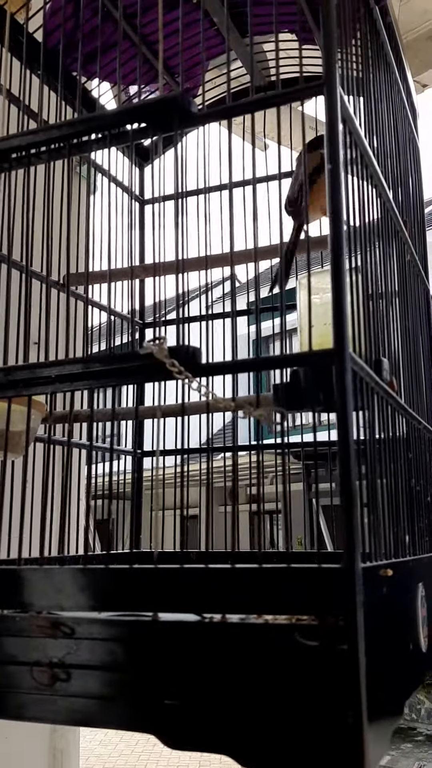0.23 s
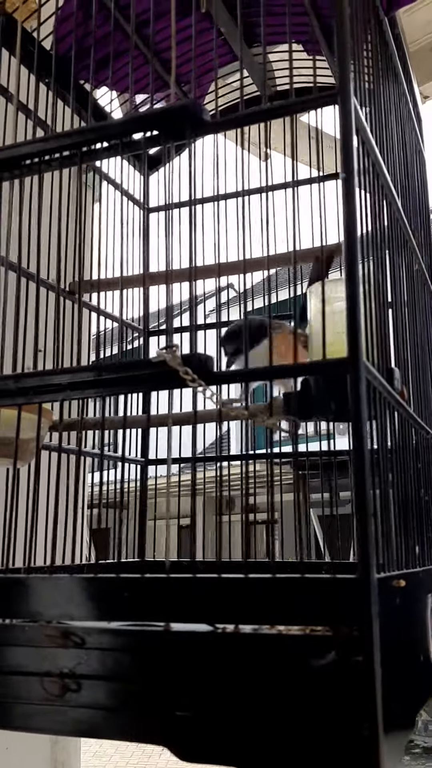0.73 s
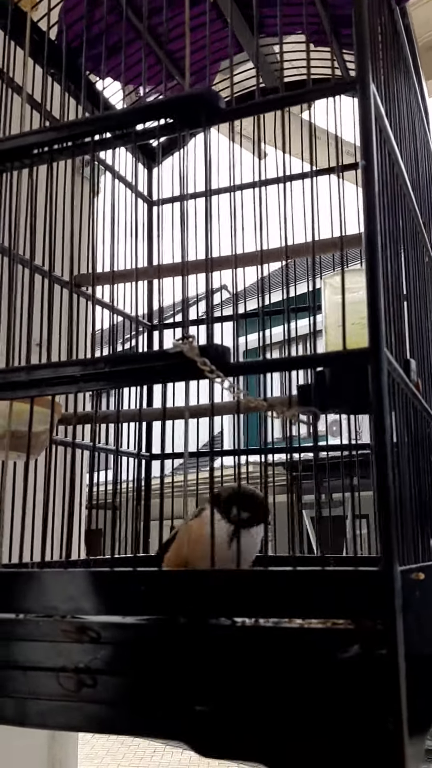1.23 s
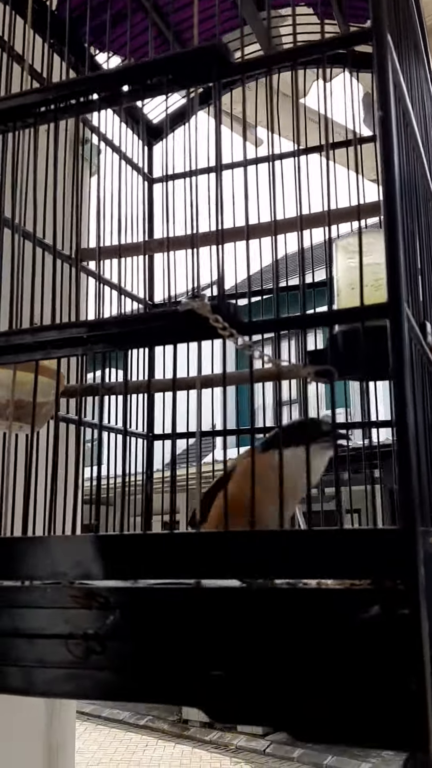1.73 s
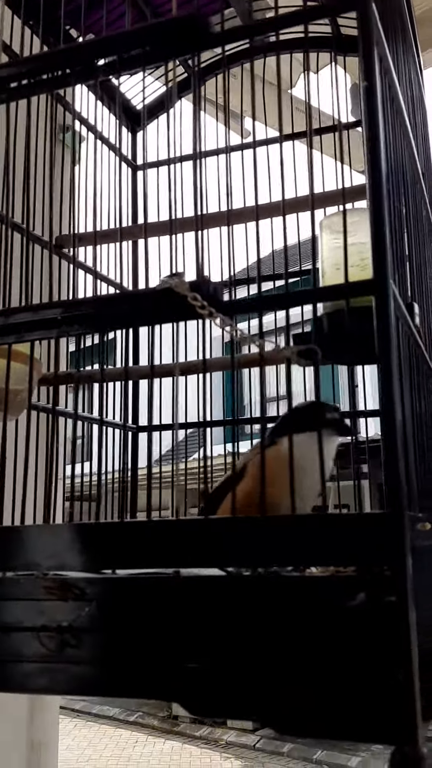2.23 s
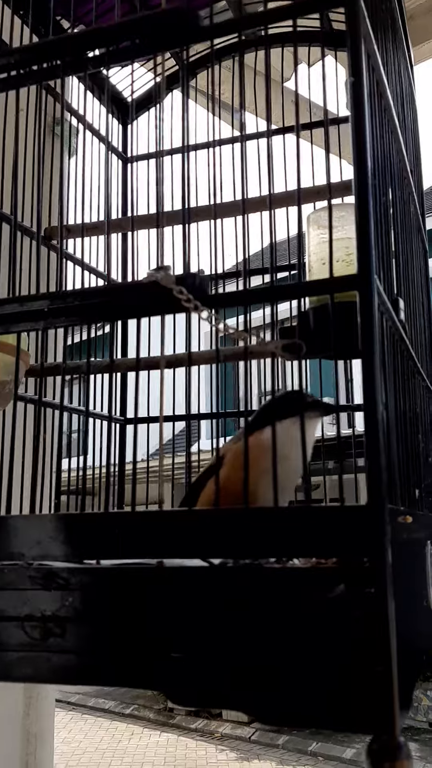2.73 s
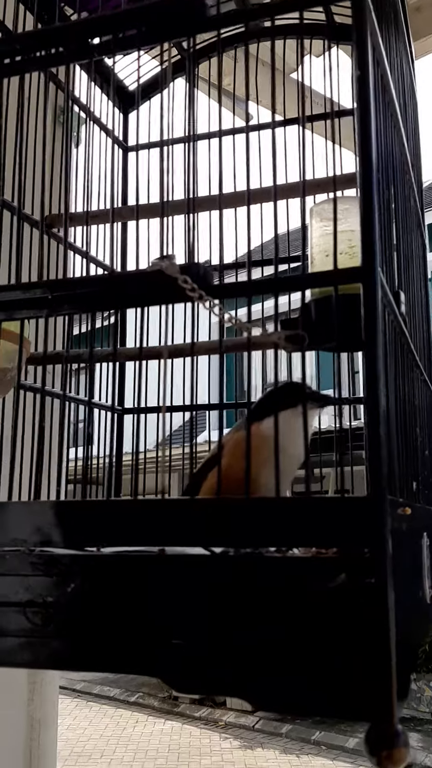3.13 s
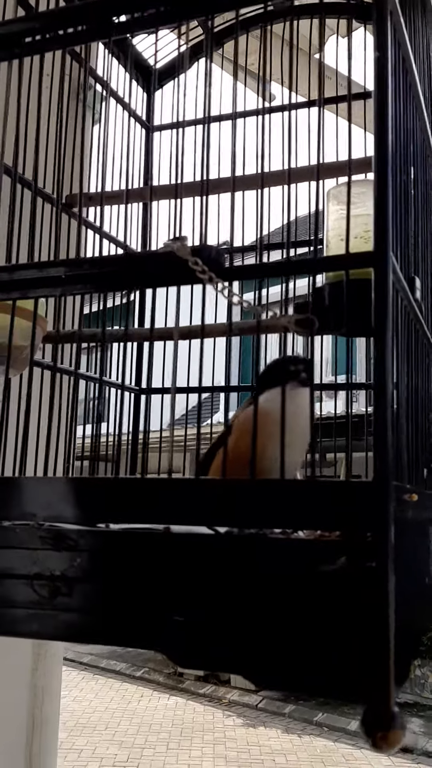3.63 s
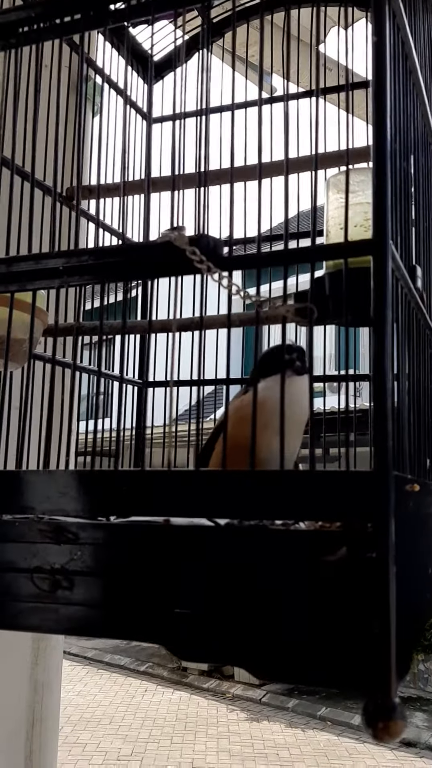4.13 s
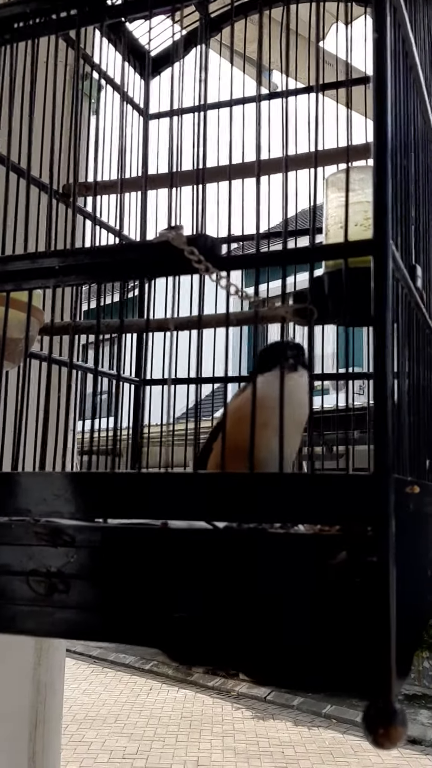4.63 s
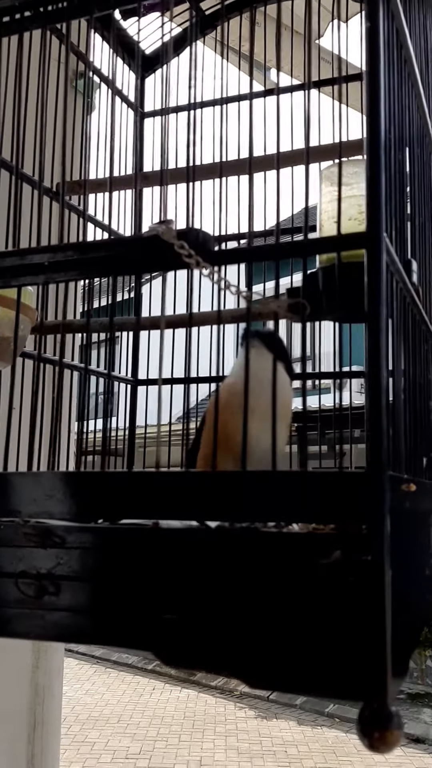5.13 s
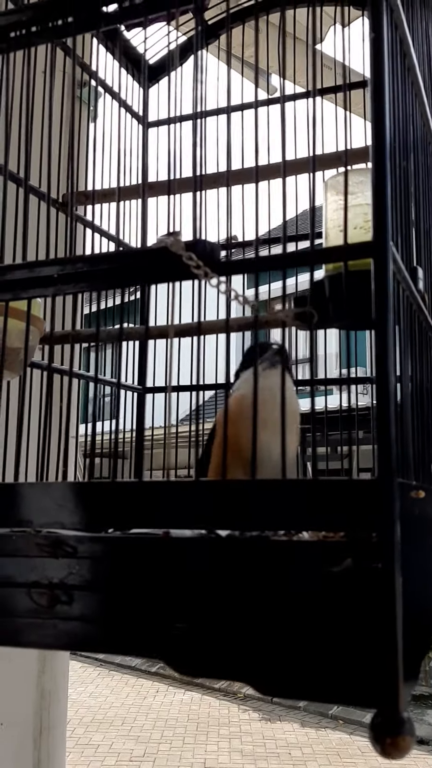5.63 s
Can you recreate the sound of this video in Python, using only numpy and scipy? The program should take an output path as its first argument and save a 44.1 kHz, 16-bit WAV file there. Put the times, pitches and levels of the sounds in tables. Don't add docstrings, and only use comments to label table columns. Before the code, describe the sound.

A caged shrike about a metre away starts with sparse, quieter rasps while claws tick lightly on the cage floor. Then it settles into a steady row of loud, harsh, clipped notes, about three a second, echoing off porch walls and paving. Another bird chirps faintly across the yard. Wind thumps the stereo phone microphone over a soft town drone.

```python
import sys
import numpy as np
from scipy import signal
from scipy.fft import rfft, irfft, next_fast_len
from scipy.io import wavfile
from scipy.ndimage import uniform_filter1d

SR = 44100
rng = np.random.default_rng(int(sys.argv[2]) if len(sys.argv) > 2 else 0)


def pcm_store(signal):
    levels = np.round(np.clip(np.atleast_2d(signal), -1, 1) * 32767)
    wavfile.write(sys.argv[1], SR, levels.astype(np.int16).T)


def boost_factor(decibels):
    exponent = np.asarray(decibels, float) / 20
    return 10 ** exponent


N = 259294
LEAD_IN = SR // 5
M = N + LEAD_IN

# start_s, length_ms, start_pitch_hz, crest_pitch_hz, level_db
RASP_RISES = [
    (.188, 29, 1200, 2200, -26.5),
    (.935, 32, 950, 1800, -22),
    (1.527, 33, 1000, 2750, -19.5),
]
RASP_FALLS = [
    (.209, 34, 2000, 2080, -28),
    (.961, 31, 1850, 2050, -20.5),
    (1.56, 25, 2300, 2030, -22),
]
DROPS = [(1.803, 23, 2550, 2330, -13.5), (2.078, 23, 2580, 2300, -13.5), (2.395, 20.5, 2255, 2430, -12.5),
         (2.7197, 22, 2300, 2470, -12.5), (3.020, 22.5, 2200, 2330, -12), (3.336, 24, 2360, 2400, -14)]
WIDE_DROPS = [(-.06, 37.5, 1500, 2600, -23), (1.286, 21.5, 2380, 2220, -17), (3.627, 25, 1800, 2090, -14.5)]
ARCHES = [(3.913, 27, 1400, 1530, -13), (4.2375, 25, 1290, 1520, -16), (4.591, 25, 1300, 1570, -15.5),
          (4.857, 32, 1150, 1640, -15.5), (5.1165, 29, 1250, 1640, -17), (5.405, 32, 1240, 1560, -14),
          (5.672, 33, 1240, 1440, -15.5)]
RISE_PATH = (.15, .56, .01, .01)
FALL_PATH = (.99, .99, .13, .36)
DROP_PATH = (.99, .99, .3, .58)
WIDE_PATH = (.99, .99, .25, .46)
ARCH_PATH = (.6, .99, .01, .18)
# attack_ms, fade_db, roughness_0_to_1, low_end_db
RISE_VOICE = (20, -13, .31, 1.5)
FALL_VOICE = (1.8, 6, .19, 9)
DROP_VOICE = (3.1, 14, .21, .1)
WIDE_VOICE = (1.8, .5, .28, 4)
ARCH_VOICE = (1.8, -2.5, .15, -.5)
# time_s, beak_stretch_ratio, treble_db, left_minus_right_db
HEAD_TURNS = [(-.06, 1.2, .1, -1.5), (.19, .78, -2.5, -4.5), (.935, 1.2, 6.5, -12), (.961, .96, 7, -5),
              (1.29, .96, -13, -13), (1.55, .9, 3, -6.5), (1.8, 1.06, 2.5, -12.5), (2.4, 1.02, -1, -11),
              (3.34, 1.03, .5, -7), (3.63, 1.28, -.2, -7), (3.91, .99, .1, -5), (4.86, 1.03, -.5, -4.2),
              (5.12, .92, -4.5, -4.5), (5.41, 1.01, -1.2, -4), (5.67, 1.02, -3.5, -4)]
# freq_hz, level_db
SHRIKE_THROAT = [(500, -60), (950, -21), (1430, -17.5), (2300, -13), (3000, -5.5), (3700, -4), (4500, 2.7),
                 (5200, -6), (6100, -8.5), (7570, -15.5), (9900, -16), (12500, -18.5), (16500, -23.5)]
# start_s, length_ms, start_pitch_hz, end_pitch_hz, level_db
FAR_SYLLABLES = [(.513, 79.7, 2510, 1880, -46), (.598, 38.2, 2740, 3220, -42), (.635, 90, 2950, 2640, -52),
                 (.64, 128, 3826, 3640, -49), (3.837, 42.4, 2620, 2530, -50.5),
                 (3.865, 52.5, 3040, 3380, -47.5), (3.941, 121.1, 4501, 3950, -41),
                 (3.945, 89, 3400, 3240, -48), (5.048, 36, 2950, 2900, -43.5), (5.09, 30, 2290, 1820, -50),
                 (5.15, 158.4, 3380, 3600, -44.5), (5.2, 90, 4350, 4280, -50)]
# freq_hz, level_db
FAR_THROAT = [(1500, -27), (2300, -16.5), (3000, -5), (3800, 1.3), (5000, -5), (6200, -5), (7600, -15.5),
              (9200, -17), (10500, -17), (12000, -12), (14000, -21), (16500, -35)]
# delay_left_ms, delay_right_ms, level_left_db, level_right_db
ECHOES = [(3.204, 2.6, -11.5, -31.5), (7.505, 7.5, -30.5, -14), (12.2, 4.9, -29, -13.5),
          (16.88, 27, -17.5, -17), (25.9, 23, -43, -27.5), (31.7, 31, -26, -19.5)]
# freq_hz, t60_s
YARD_T60 = [(1000, 1), (2500, 0.47), (5000, 0.58), (8000, 0.44), (14000, 0.36)]
# freq_hz, left_minus_right_db
PORT_BALANCE = [(60, 4.0), (110, 0.0), (200, -1.5), (380, -1.5), (700, -5), (1290, 12), (2380, 1),
                (4400, 10.5), (8120, 1.5), (15000, 6)]
# freq_hz, left_lead_rad
PORT_LEAD = [(1, 1), (1380, 1.44), (1980, 1), (3190, 2.5), (3620, 2.4), (4130, 1.23), (5340, 0.95),
             (6370, 2), (7670, 2), (11900, 5), (15200, 4.5), (16500, 41)]
# time_s, tick_db, knock_pitch_hz, knock_db, left_minus_right_db
CLAWS = [(0.7794, -57, 600, -63, -3.0),
         (0.8594, -43, 695, -46, -2.5),
         (1.0694, -32, 1130, -44, -1.5),
         (1.0899, -35, 814, -35, -3.0),
         (1.1114, -33, 854, -42, -2),
         (1.1174, -33, 785, -35, -4),
         (1.2191, -35.5, 616, -44, -3.5),
         (1.792, -62, 1020, -34.5, .1)]
# peak_s, peak_db, die_by_10db_s, left_minus_right_db
GUSTS = [(0, -40, .03, -20), (.16, -47, .1, -15), (.47, -42, .07, 8), (.6, -30, .13, -10),
         (.8, -28.5, .08, -6), (.98, -37, .08, -2), (1.17, -37.5, .09, -9), (1.5, -40.5, .25, -3),
         (2.08, -48, .1, 2), (2.86, -43.5, .14, -5), (3.22, -46, .07, -12), (3.5, -48, .06, 8),
         (3.68, -42, .12, 9), (4.01, -45.5, .07, 9), (4.8, -52, .06, 15), (5.06, -49, .1, 10),
         (5.42, -48, .07, 5), (5.67, -45, .06, 8), (5.82, -52, .08, 10)]
# freq_hz, level_db
WIND_COLOUR = [(12, -43), (20, -68), (46, 3), (93, 2), (198, -11), (398, -27), (455, -27), (490, -29.5),
               (700, -31.5), (910, -63), (1540, -120)]
# start_s, length_s, pitch_hz, level_db, unsteadiness_hz
TONES = [
    (.2, 0.64, 462.1, -57.5, 7.6),
    (1.08, 0.39, 468.5, -53.5, 9.2),
    (2.476, 0.11, 307, -43.5, 32),
    (2.688, 0.3, 7100, -60, 6.2),
    (4.354, 0.24, 6975, -65, 6),
]
# freq_hz, level_db
TOWN_COLOUR = [(41, -7), (70, -2.5), (146, 2.5), (480, -14), (1550, -20.5), (1820, -22), (3300, -26),
               (4440, -20.5), (7030, -28.5), (8440, -41), (9250, -37), (13700, -39), (16800, -58)]
# freq_hz, level_under_neighbours_db
MASKED = [(2000, -25), (5000, -16), (8500, -4.5), (14000, -1.5)]


def curve(points, hz):
    at, value = np.transpose(points)
    return np.interp(np.log(np.maximum(hz, 1)), np.log(np.maximum(at, 1)), value)


def shape(x, response):
    size = next_fast_len(x.shape[-1])
    hz = np.arange(size // 2 + 1) * SR / size
    return irfft(rfft(x, size) * response(hz), size)[..., :x.shape[-1]]


def unit(x):
    return x / np.sqrt(np.mean(x ** 2, axis=-1, keepdims=True))


def wobble(size, rate):
    k = max(int(SR / rate), 1)
    return unit(uniform_filter1d(uniform_filter1d(rng.standard_normal(size), k), k))


def add(track, s, sound):
    i = int(s * SR) + LEAD_IN
    track[..., i:i + sound.shape[-1]] += sound


def pan(left_minus_right_db):
    return boost_factor(np.array([[left_minus_right_db], [-left_minus_right_db]]) / 2)


def syllable(ms, pitch_hz, db, attack_ms, fade_db, rough, colour):
    t = np.arange(8192) / SR
    u = np.minimum(t * 1e3 / ms, 1)
    glide = np.interp(u, [0, 1 / 3, 2 / 3, 1], pitch_hz)
    hz = uniform_filter1d(glide, int(ms * SR / 4000), mode="nearest")
    phase = 2 * np.pi * np.cumsum(hz * (1 + 0.095 * rough * wobble(len(t), 1002))) / SR

    k = np.arange(1, 15)[:, None]
    audible = k * hz < .45 * SR
    tiring = boost_factor(-1.7 * k * u)
    stack = np.sum(np.cos(k * phase + .3 * k ** 2) * audible * tiring, axis=0)
    onset = np.exp(-t * 1e3 / attack_ms)
    breath = rough * (1.7 + 6 * onset) * rng.standard_normal(len(t))
    source = (1 + .7 * rough * wobble(len(t), 500)) * stack + breath

    swell = (1 - onset) ** 2 * boost_factor(-fade_db * u) * np.maximum(1 - u ** 4.7, 0) ** 0.87
    sound = np.roll(shape(np.roll(swell * source, 64), colour), -64)
    return boost_factor(db) * sound / np.sqrt(np.sum(sound ** 2) / (ms / 1e3 * SR))


def shrike():
    near, mouth = np.zeros((2, M)), np.zeros(M)
    head_s, *head = np.transpose(HEAD_TURNS)
    kinds = [(RASP_RISES, RISE_PATH, RISE_VOICE), (RASP_FALLS, FALL_PATH, FALL_VOICE),
             (DROPS, DROP_PATH, DROP_VOICE), (WIDE_DROPS, WIDE_PATH, WIDE_VOICE),
             (ARCHES, ARCH_PATH, ARCH_VOICE)]
    for notes, (early, late, sag, sag_end), (attack_ms, fade_db, rough, low_db) in kinds:
        for s, ms, start_hz, crest_hz, db in notes:
            climb_hz = (crest_hz - start_hz) * np.array([0, early, late, 1])
            pitch_hz = start_hz + climb_hz - crest_hz * np.array([0, 0, sag, sag_end])
            beak, bright_db, pan_db = (np.interp(s, head_s, column) for column in head)
            tilt = [(2600, low_db), (3600, 0.015), (6500, 0.012), (10000, bright_db)]
            colour = lambda f: boost_factor(curve(SHRIKE_THROAT, f / beak) + curve(tilt, f))
            sound = syllable(ms, pitch_hz, db, attack_ms, fade_db, rough, colour)
            add(near, s, sound * pan(pan_db))
            add(mouth, s, sound)
    return near, mouth


def far_bird():
    far = np.zeros(M)
    bow, attack_ms, fade_db_per_s = .03, 5, 30
    base_rough, strain_hz, strain_per_khz = .26, 3450, .65
    for s, ms, start_hz, end_hz, db in FAR_SYLLABLES:
        pitch_hz = np.linspace(start_hz, end_hz, 4) * (1 + bow * np.array([0, 1, 1, 0]))
        strain = strain_per_khz * max(start_hz - strain_hz, 0) / 1e3
        rough = min(base_rough + strain, 1)
        fade_db = fade_db_per_s * ms / 1e3
        colour = lambda f: boost_factor(curve(FAR_THROAT, f))
        add(far, s, syllable(ms, pitch_hz, db, attack_ms, fade_db, rough, colour))
    return far


def ports(left_right):
    def half(f):
        lead_rad = np.interp(f, *np.transpose(PORT_LEAD))
        return boost_factor(curve(PORT_BALANCE, f) / 2) * np.exp(.5j * lead_rad)
    return np.array([shape(left_right[0], half), shape(left_right[1], lambda f: 1 / half(f))])


def reverb_tails():
    porch_t60_s, yard_rise_ms = 0.27, 15.3
    t = np.arange(SR) / SR
    noise = rng.standard_normal((2, 2, SR))
    yard = np.zeros((2, SR))
    for centre in 700 * 2 ** np.arange(0, 4.6, .5):
        band = lambda f: np.clip(1 - np.abs(2 * np.log2(np.maximum(f, 1) / centre)), 0, 1)
        yard += shape(noise[0], band) * boost_factor(-60 * t / curve(YARD_T60, centre))
    yard = yard * (1 - np.exp(-t * 1e3 / yard_rise_ms))
    porch = noise[1] * boost_factor(-60 * t / porch_t60_s) * np.minimum(t / 0.0019, 1)
    return unit(porch) / np.sqrt(SR), unit(yard) / np.sqrt(SR)


def echo(x, pattern):
    return signal.fftconvolve(x[None], pattern, axes=1)[:, :M]


def birds():
    near, mouth = shrike()
    far = far_bird()
    porch, yard = reverb_tails()
    walls = boost_factor(-12) * porch + boost_factor(-16.5) * yard
    for *ms, left_db, right_db in ECHOES:
        walls[[0, 1], (np.array(ms) * SR / 1e3).astype(int)] += boost_factor(np.array([left_db, right_db]))
    direct = ports(near + boost_factor(3.5) * far)
    return direct + echo(mouth, walls) + echo(far, porch + boost_factor(4) * yard)


def claws():
    out, t = np.zeros((2, M)), np.arange(2048) / SR
    for s, tick_db, hz, knock_db, pan_db in CLAWS:
        scrape = np.diff(rng.standard_normal((2, len(t) + 1)))
        tick = scrape * (np.exp(-t / 0.002) + 0.25 * np.exp(-t / 0.035))
        knock = np.sin(2 * np.pi * hz * t) * np.exp(-t / .004)
        add(out, s, (boost_factor(tick_db - 9.5) * tick + boost_factor(knock_db + 1.5) * knock) * pan(pan_db))
    return out


def wind():
    t = (np.arange(M) - LEAD_IN) / SR
    eddies = unit(shape(rng.standard_normal((2, M)), lambda f: boost_factor(curve(WIND_COLOUR, f))))
    side = np.array([[.5], [-.5]])
    gust = boost_factor(-60)
    for s, db, die_s, pan_db in GUSTS:
        gust = gust + boost_factor(db + side * pan_db - 10 * np.abs(t - s) / die_s)
    flutter_db = 1.52 * np.array([wobble(M, 8.1), wobble(M, 8.1)])
    return gust * boost_factor(flutter_db) * eddies


def tones():
    out = np.zeros(M)
    for s, length_s, hz, db, unsteady_hz in TONES:
        size = int(length_s * SR)
        phase = 2 * np.pi * np.cumsum(hz + unsteady_hz * wobble(size, 32)) / SR
        add(out, s, boost_factor(db) * np.sin(phase) * np.hanning(size) ** .5)
    return out


def town():
    level_db, alike_below_hz = -47, 910
    mid, side = rng.standard_normal((2, M))
    colour = lambda f: boost_factor(curve(TOWN_COLOUR, f))
    apart = shape(side, lambda f: colour(f) * np.clip(f / alike_below_hz, .25, 1))
    both = shape(mid, colour) + apart * np.array([[1], [-1]])
    return boost_factor(level_db + 1.5 + 0.9 * wobble(M, 1)) * unit(both)


def scene():
    return (birds() + claws() + tones() + wind() + town())[:, LEAD_IN:]


def thin(x):
    faint_db, sudden_db = -95, 8
    hz, _, z = signal.stft(x, SR, nperseg=2048)
    band = np.mean(np.abs(z[:, :1024].reshape(2, 64, 16, -1)) ** 2, axis=(0, 2))
    around = uniform_filter1d(band, size=9, axis=0)
    unmasked = band > around * boost_factor(2 * curve(MASKED, hz[8:1024:16, None]))
    keep = unmasked & (band > boost_factor(2 * faint_db))
    total = band[4:].sum(axis=0)
    keep |= total > boost_factor(2 * sudden_db) * np.roll(total, 2)
    keep = np.repeat(keep, 16, axis=0) | (hz[:1024, None] < 1700)
    z[:, :1024] *= keep
    return signal.istft(z, SR, nperseg=2048)[1][:, :N]


def roll_off(x):
    return signal.sosfilt(signal.butter(12, 16980, fs=SR, output="sos"), x)


def record(dry):
    rounded = np.tanh(.4 * dry) / .4
    top_cut = signal.cheby2(12, 50, 16900, fs=SR, output="sos")
    mix = thin(signal.sosfilt(top_cut, rounded))
    return roll_off(mix)


dry = scene()
out = record(dry)
pcm_store(out)
```